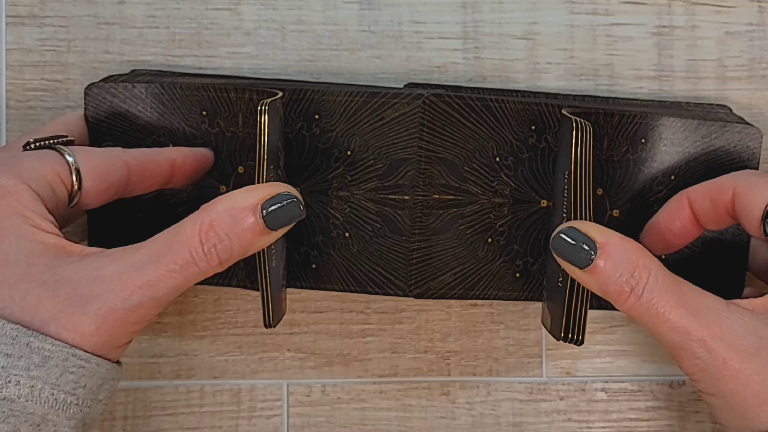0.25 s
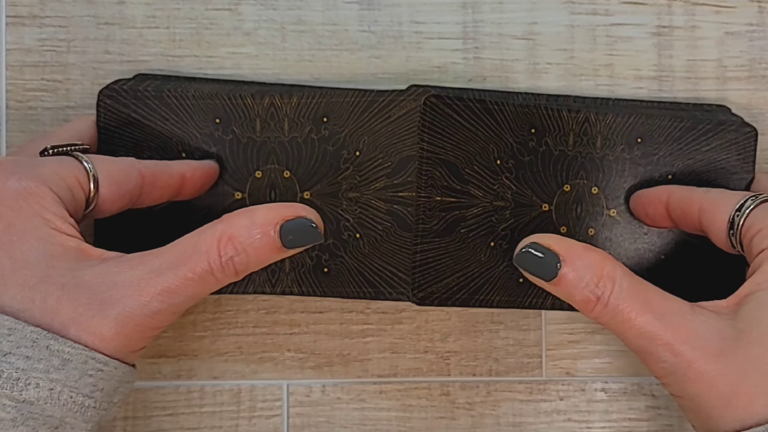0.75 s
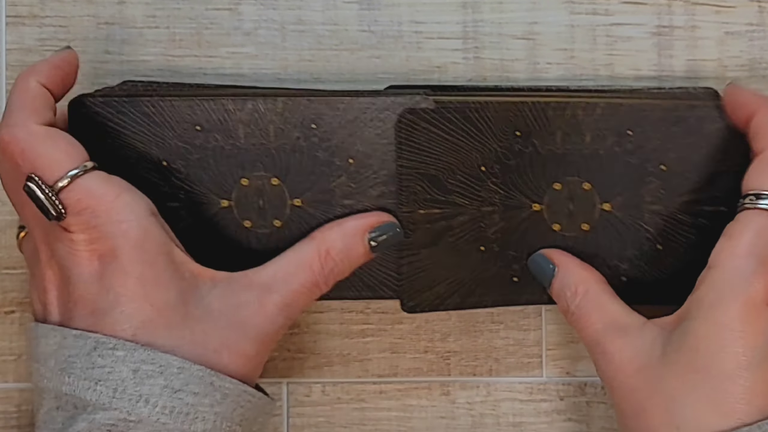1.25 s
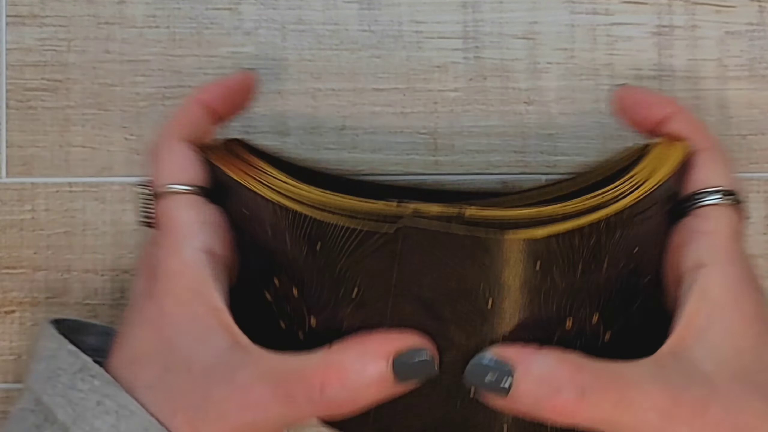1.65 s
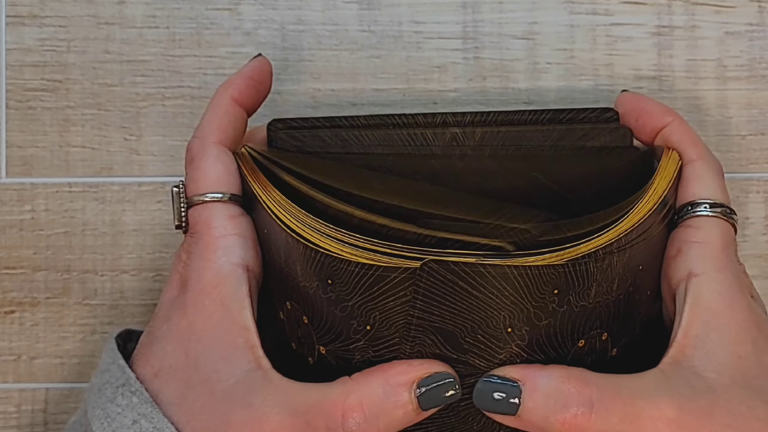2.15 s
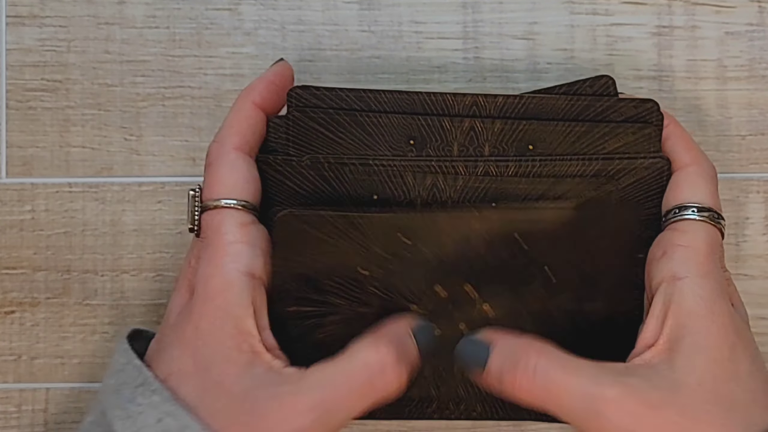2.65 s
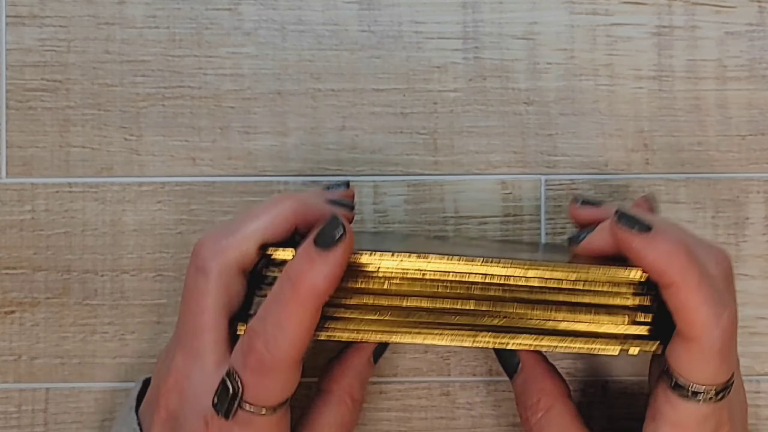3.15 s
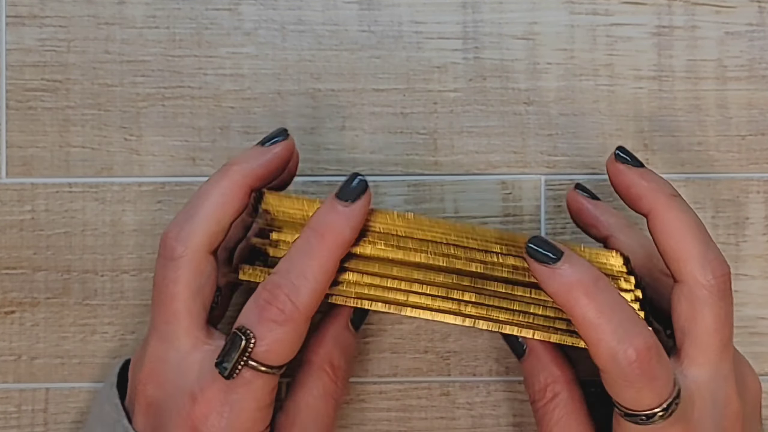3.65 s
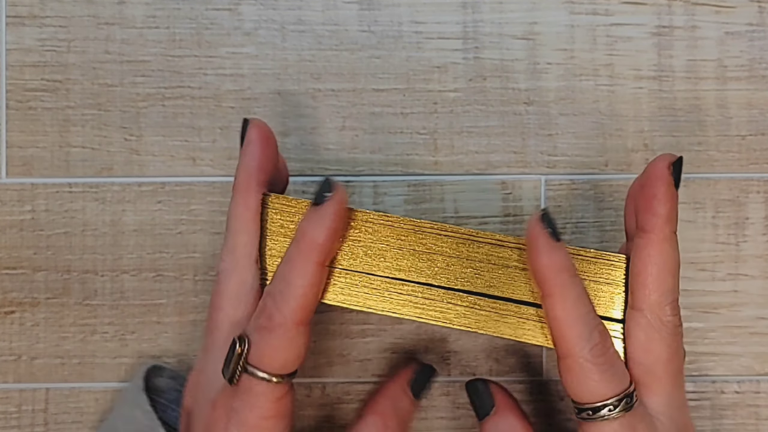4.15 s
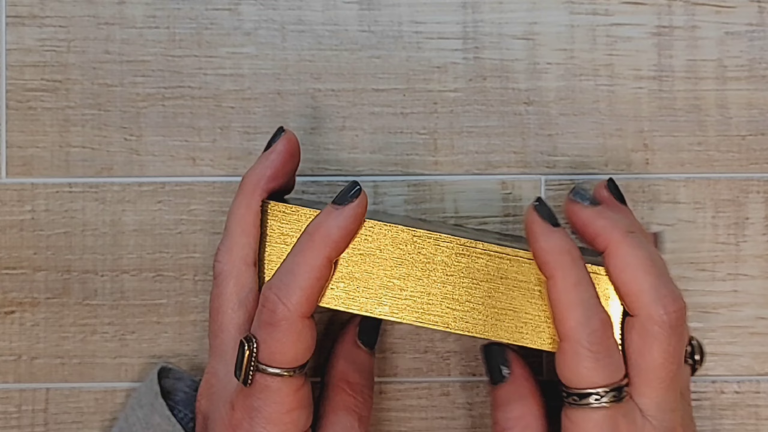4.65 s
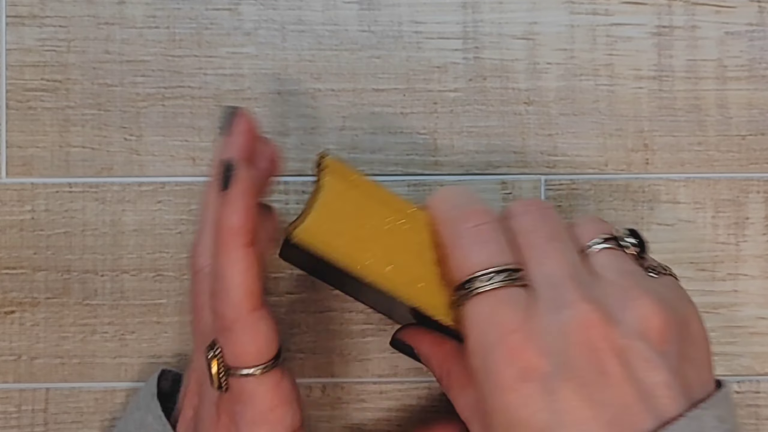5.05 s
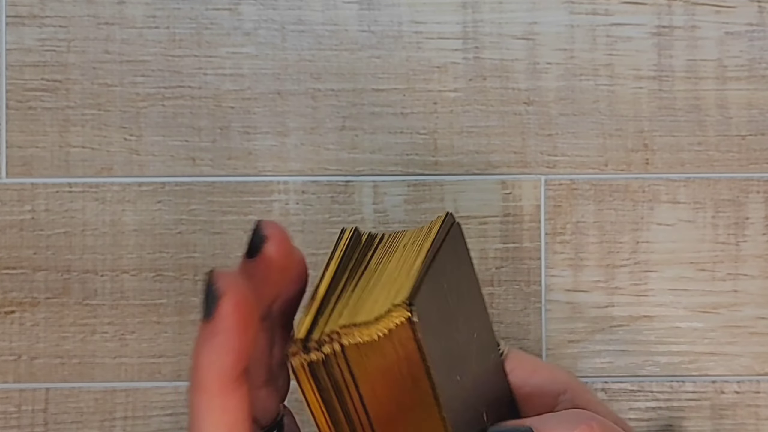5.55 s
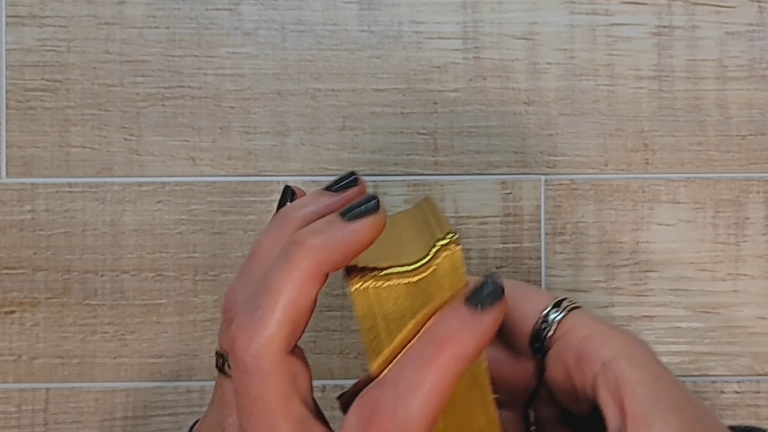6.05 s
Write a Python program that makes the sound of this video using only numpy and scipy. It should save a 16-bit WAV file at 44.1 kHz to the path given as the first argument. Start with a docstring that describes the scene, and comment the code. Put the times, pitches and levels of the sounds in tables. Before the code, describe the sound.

Stiff cards riffle in uneven sharp snaps, pause, cascade together in a bright whirring rush, then get knocked square and slapped once in a small room.

```python
"""At a wooden table in a small damped, humming room, one microphone close to a deck of stiff cards.
The deck is riffled, bridged so the cards cascade together, then squared and tapped.
Each card snaps: a noise burst rings its air pocket, with a short crack above and a thud below.
Sliding faces hiss as flickering, gritty noise; the table top booms under hands and blows as resonated noise;
close surfaces return a dense, smooth, short tail, and the room hum is steady low noise."""
import sys
import numpy as np
from scipy import signal
from scipy.io import wavfile
from scipy.ndimage import uniform_filter1d

SR = 44100
rng = np.random.default_rng(int(sys.argv[2]) if len(sys.argv) > 2 else 0)


def decibels_to_gain(level_db):
    """Convert a level in decibels to a linear amplitude gain (20 dB per decade)."""
    exponent = np.asarray(level_db, float) / 20
    return 10 ** exponent


def to_wav(sig):
    """Store sig (one row per channel, or 1-D mono) as 16-bit WAV at the path in sys.argv[1].

    Samples outside -1..1 are clipped; the rate is SR.
    """
    pcm = np.clip(np.atleast_2d(sig), -1, 1) * 32767
    pcm = np.round(pcm).astype(np.int16)
    wavfile.write(sys.argv[1], SR, pcm.T)  # frames by channels


N = 277551   # length in samples

# Room hum behind the table. Each row: frequency in Hz, relative density in dB per Hz.
HUM_SPECTRUM = [(30, -39.5), (79, -9.5), (98, -9), (145, -19.5), (287, -25.5), (364, -23.5), (449, -40),
                (499, -36), (1160, -50), (2200, -61), (4000, -55.5), (6600, -58.5), (8300, -67),
                (16000, -70)]
# Hiss of card faces rubbing. Each row: frequency in Hz, relative density in dB per Hz.
RUBBING_SPECTRUM = [(130, -21.5), (220, 3.5), (451, 3.5), (1550, 5.5), (3360, 3.5), (6530, 1),
                    (16000, -17.5)]
# Strokes of card faces sliding. Each row: start of full level in seconds, hold in seconds,
# climb in seconds for its last 20 dB (anything under 0.012 counts as 0.012), level in dB, treble share in dB.
SLIDING_STROKES = [(0.01, 0.72, 0.6, -59.5, -8), (1.195, 0.8, -0.27, -62, -11.5),
                   (1.247, 0.02, -0.09, -53, -12), (1.315, 0.014, -0.25, -52, -15),
                   (1.406, 0.025, -0.09, -55, -19), (1.461, 0.0068, -0.09, -52, -4),
                   (1.53, 0.012, -0.03, -46, -12.5), (1.639, 0.033, 0.06, -50.5, -13.5),
                   (1.819, 0.24, 0.0459, -30.5, 6), (2.065, 0.715, 0.0147, -28.5, 3),
                   (2.812, 0.042, 0.15, -48, -19), (3.048, 0.064, 0.0672, -32.5, -9),
                   (3.24, 0.025, 0.06, -36, -17.5), (3.3, 0.053, 0.0835, -27.5, -25),
                   (3.515, 0.025, 0.03, -46.5, -34), (3.567, 0.051, 0.11, -39, -29),
                   (3.671, 0.06, -0.11, -52, -29), (3.775, 0.054, -0.45, -53.5, -19.5),
                   (3.947, 0.0063, 0.3, -55, -34), (3.962, 0.12, -0.26, -49.5, -19),
                   (4.082, 0.035, -0.0541, -39.5, -22), (4.261, 0.06, -0.0742, -49.5, -17.5),
                   (4.791, 0.034, -0.23, -65, -38), (4.969, 0.054, 0.03, -52, -26),
                   (5.035, 0.088, 0.03, -58, -18), (5.129, 0.018, 0.0547, -37, -15),
                   (5.191, 0.032, 0.06, -35, -18.5), (5.664, 0.075, 0, -72.5, -12),
                   (5.944, 0.025, 0.03, -50, -19.5), (5.977, 0.029, 0.3, -61.5, -4)]
# Cards that slip off a thumb, then slap flat on the pile.
# Each row: slip in seconds, slap in seconds, slip level in dB, slap level in dB, air pocket of the slap in Hz.
RIFFLED_CARDS = [(0.025, 0.0406, -23, -17.5, 1660), (0.054, 0.066, -21.5, -15, 990),
                 (0.07, 0.084, -16.5, -7.5, 1557), (0.17, 0.184, -16.5, -10, 1189),
                 (0.286, 0.3013, -23.5, -15.5, 1640), (0.309, 0.3254, -14.5, -8.5, 1526),
                 (0.383, 0.396, -17, -7.5, 1664), (0.513, 0.528, -16.5, -12, 1122),
                 (0.545, 0.559, -13.5, -7.5, 1456), (0.631, 0.648, -11.5, -4, 2250),
                 (0.664, 0.68, -9.5, -12, 1765), (0.697, 0.709, -8.5, -8.5, 2015),
                 (0.78, 0.794, -7, -8.5, 1759), (0.869, 0.884, -13.5, -14.5, 1892)]
# An edge drags on the thumb before a run of cards. Each row: start in seconds, level in dB.
THUMB_DRAGS = [(0.162, -29.5), (0.285, -32), (0.3775, -27), (0.508, -32)]
# Pushes of the hands on the table top.
# Each row: strongest moment in seconds, low boom level in dB, upper boom level in dB.
HAND_PUSHES = [(0.059, -31.5, -45.5), (0.35, -34, -42), (0.6, -32.5, -39), (0.8, -30, -40),
               (1.25, -45, -52.5), (1.57, -36, -35), (1.88, -40, -44.5), (2.17, -30, -49),
               (2.4, -37, -44.5), (2.679, -29, -36), (3.34, -30, -34.5), (3.62, -47.5, -34.5),
               (4.129, -44, -43), (5.119, -39.5, -41.5), (5.285, -33, -40)]
# Low plate modes of the table top.
# Each row: frequency in Hz, width in Hz of the first of two resonators (the second is twice as wide), level in dB.
TABLE_LOW_MODES = [(75, 18, 4), (82.6, 96, -6.5), (109.55, 7.7, 4)]
# Cards and deck edges knocking while bridged and squared.
# Each row: start in seconds, level in dB, air pocket in Hz, crack in dB relative to that level.
KNOCKS = [(1.196, -47, 1300, -18), (1.533, -37, 3320, -1), (1.798, -22.5, 1747, -28),
          (1.865, -14.5, 1710, -21), (1.872, -6.5, 2028, -18.5), (1.888, -16, 873, -9),
          (2.817, -21, 1485, 11), (3.183, -26.5, 2390, -14.5), (3.202, -17.5, 2356, -21),
          (3.225, -20.5, 1500, -31.5), (3.299, -8.5, 2212, -16), (3.311, -9, 1800, -7.5),
          (3.319, -3, 3440, -11), (3.337, -10, 2980, -39), (3.38, -23.5, 2777, -21.5),
          (3.389, -16.5, 2000, -34.5), (3.449, -30, 2150, -18), (3.454, -23.5, 2733, -24),
          (3.476, -35, 1505, -37.5), (3.5, -21.5, 2010, -21), (3.573, -31, 1900, -29.5),
          (3.622, -20.5, 2500, -22), (3.667, -22, 2827, -17), (3.725, -37, 1800, -17),
          (3.869, -38.5, 636, -38), (3.897, -38, 1640, -45), (3.95, -14.5, 2260, -24.5),
          (4.017, -21.5, 2577, -32), (4.027, -14, 2886, -16.5), (4.094, -21, 2623, -19),
          (4.111, -25.5, 2208, -30), (4.26, -29, 3315, -21.5), (5.101, -21.5, 2454, -24),
          (5.221, -17, 6015, -7), (5.67, -54, 800, -11.5), (5.816, -53, 5030, -24.5),
          (5.863, -51.5, 5970, -22.5), (5.949, -37.5, 3400, -15), (5.972, -50, 2200, -21),
          (6.195, -42.5, 4500, -12)]
# The clearest cards of the cascade, whistling as they slip home.
# Each row: start in seconds, level in dB, air pocket in Hz.
CLEAR_WHISTLES = [(1.98, -17.5, 2414), (1.995, -15, 6590), (2.114, -13.5, 5800), (2.204, -14, 6000),
                  (2.221, -11, 3900), (2.471, -14, 4830), (2.498, -12.5, 4630), (2.574, -10, 6380),
                  (2.765, -10, 7500)]
# The clearest cards landing flat under the arch. Each row: start in seconds, level in dB, air pocket in Hz.
CLEAR_FLAPS = [(2.052, -11.5, 1060), (2.084, -27, 502), (2.128, -20, 894), (2.14, -21, 1300),
               (2.193, -23, 551), (2.234, -18, 692), (2.333, -23.5, 1500), (2.367, -25.5, 599),
               (2.467, -24.5, 1240), (2.534, -19, 1400), (2.597, -21.5, 1000), (2.629, -23.5, 521),
               (2.652, -14.5, 1164), (2.707, -22, 801), (2.76, -22, 803), (2.793, -18, 740)]
# Modes of the closed deck under a palm. Each row: frequency in Hz, level in dB.
DECK_MODES = [(845, -9), (1600, -7.5), (2520, -2), (4270, -0.5), (5120, 2.5), (6700, -5), (8000, -3)]


def rms_one(x):
    """Scale to rms 1."""
    return x / np.sqrt(np.mean(x ** 2) + 1e-20)


def drift(rate_hz):
    """Random wavering of rms 1: noise low-passed at about rate_hz."""
    pole = np.exp(-40 * np.pi * rate_hz / SR)   # computed at every 20th sample
    noise = rng.standard_normal(N // 20 + 2002)
    slow = signal.lfilter([1], [1, -2 * pole, pole * pole], noise)[2000:]
    return np.interp(np.arange(N) / 20, np.arange(len(slow)), rms_one(slow))


def resonance(x, hz, width_hz):
    """Two-pole peak of gain 1."""
    r = np.exp(-np.pi * width_hz / SR)
    feedback = [1, -2 * r * np.cos(2 * np.pi * hz / SR), r * r]
    return signal.lfilter([(1 - r * r) / 2, 0, (r * r - 1) / 2], feedback, x)


def band(x, low_hz, high_hz):
    """Butterworth band-pass."""
    edges = [low_hz, min(high_hz, SR * .45)]
    return signal.sosfilt(signal.butter(2, edges, "band", fs=SR, output="sos"), x)


def coloured(white, spectrum, tilt, patchy_db, rate_hz):
    """Third-octave bands, each flickering; tilt (dB per octave about 1800 Hz) keeps the unflickered power."""
    out, power = 0, 0
    edges = 28 * 2 ** (np.arange(29) / 3)
    together = drift(rate_hz)
    at_hz, density_db = np.transpose(spectrum)
    for k, (low, high) in enumerate(zip(edges, edges[1:])):
        hz = np.sqrt(low * high)
        slope_db = tilt * max(np.log2(hz / 1800), -.7)   # levels off below about 1100 Hz
        gain = decibels_to_gain(np.interp(np.log(hz), np.log(at_hz), density_db) + slope_db)
        flicker = decibels_to_gain(patchy_db * (0.77 * together + drift(rate_hz)))
        out = out + gain * flicker * band(white[k % 2], low, high)
        power = power + gain ** 2 * (high - low) * 2 / SR
    return out / np.sqrt(power)


def swell(start, hold, db, rise_s, fall_s, bend):
    """Power of gestures, one row each: a climb, a hold and a fall, with times per 20 dB."""
    start, hold, db, rise_s, fall_s = (np.asarray(v)[..., None] for v in (start, hold, db, rise_s, fall_s))
    t = np.arange(0, N, 16) / SR - start   # every 16th sample
    away = np.maximum(-t, 0) / rise_s + np.maximum(t - hold, 0) / fall_s
    return decibels_to_gain(2 * (db - 20 * away ** bend))


def fine(coarse):
    """Spread a control held at every 16th sample over every sample."""
    return np.interp(np.arange(N) / 16, np.arange(len(coarse)), coarse)


def snaps(rows, rise_ms_at_3k, thud_db, width, edge, ring_db=-3.0, crack_hz=3800, puff_db=-60):
    """A click and lumpy burst ring the pocket between cards, with crack, thud (more in large pockets) and puff.

    Each row: start in seconds, level in dB, pocket in Hz, crack in dB, fall in ms. Width is a share of the pitch.
    """
    out = np.zeros(N + 2048)
    t_ms = np.arange(2048) * 1000 / SR
    squeeze = t_ms / 0.33 - 2   # air squeezed out as a face lands: 0.33 ms scale
    puff = squeeze * np.exp(-squeeze ** 2 / 2)
    for s, level_db, hz, crack_db, fall_ms in rows:
        noise, lumps = rng.standard_normal((2, 2048))
        rise_ms = rise_ms_at_3k * (hz / 3000) ** 0.84   # higher pockets swell more slowly
        fall = np.exp(-t_ms / max(fall_ms, .3))
        lumpy = decibels_to_gain(4.5 * rms_one(band(lumps, 130, 2000)))
        burst = noise * (1 - np.exp(-(t_ms / rise_ms) ** 2)) * fall * lumpy
        burst[20] += edge   # click of first contact
        pocket = band(burst, 0.5 * hz, 1.9 * hz)
        ring = resonance(pocket, hz, width * hz)
        card = band(pocket, 0.26 * hz, 2.6 * hz)
        crack = band(burst * fall ** 0.4, crack_hz, 13500)   # briefer than the ring
        thud = band(burst, 170, 560)
        pocket_thud_db = thud_db - 3.9 * np.log2(hz / 1000)
        gains = decibels_to_gain(level_db + np.array([ring_db, -7., crack_db, pocket_thud_db, puff_db]))
        at = max(round(s * SR) - 20, 0)   # puts the click on the stated moment
        parts = [ring, card, crack, thud, puff]
        out[at:at + 2048] += sum(g * p / np.abs(p).max() for g, p in zip(gains, parts))
    return out[:N]


def hum():
    """The small room's steady hum: mostly low noise whose bands waver slowly."""
    white = rng.standard_normal((2, N))
    return decibels_to_gain(-53) * coloured(white, HUM_SPECTRUM, 0, patchy_db=2.5, rate_hz=5.4)


def slide():
    """Paper grain catches as fast noise, edges snag now and then; pressed cards slide duller than free ones."""
    start, hold, climb, db, treble = np.transpose(SLIDING_STROKES)
    climb = np.maximum(climb, .012)
    power = swell(start, hold, db, climb, 0.7 * climb, bend=0.89)   # falls are quicker than climbs
    # a very faint constant hiss under the strokes keeps the total above zero
    floor, floor_treble_db = decibels_to_gain(2 * -92), -9
    total = power.sum(axis=0) + floor
    treble_db = fine((treble @ power + floor_treble_db * floor) / total)

    snags_per_s, mean_snag, snag_s = 54, 0.25, 0.0025
    snags = (rng.random(N) < snags_per_s / SR) * rng.exponential(1, N) * mean_snag
    snags = 1 + signal.lfilter([1], [1, -np.exp(-1 / max(snag_s * SR, 2))], snags + 1e-18)
    catches = decibels_to_gain(2.6 * np.minimum(rng.exponential(1, (2, N)), 4))
    grit = rng.standard_normal((2, N)) * catches * snags

    free_treble_db = -9   # treble share of freely sliding faces: no tilt
    tilt = (treble_db - free_treble_db) / np.log2(11000 / 1800)
    faces = coloured(grit / grit.std(), RUBBING_SPECTRUM, tilt, patchy_db=2.5, rate_hz=18.0)
    # from 3.4 s, closed into a block, the deck rubs with a fuller body
    block = band(faces, 250, 830)
    closed = np.clip((np.arange(N) / SR - 3.4) * 10, 0, 1)
    return fine(np.sqrt(total)) * (faces + decibels_to_gain(2.5) * closed * block)


def riffle():
    """Every card slips with a thin double whistle, then lands with a fuller slap; some edges drag first."""
    mean_slip_hz, slip_crack_db, slip_ms = 4340, -19, 2.6   # the edge leaving the thumb
    slap_crack_db, slap_ms = -3, 3.65   # the face landing
    whistles = [(0, 1), (-5, 1.62)]   # level in dB, multiple of the slip pitch
    edges = [(row[0], row[2]) for row in RIFFLED_CARDS] + THUMB_DRAGS
    bends = 1 + 0.11 * rng.standard_normal(len(edges))
    slips = [(s, db + less_db, mean_slip_hz * bend * multiple, slip_crack_db, slip_ms)
             for (s, db), bend in zip(edges, bends)
             for less_db, multiple in whistles]
    slaps = [(slap, db, hz, slap_crack_db, slap_ms) for _, slap, _, db, hz in RIFFLED_CARDS]
    return (snaps(slips, rise_ms_at_3k=1.6, thud_db=-8.0, width=0.1, edge=0.28)
            + snaps(slaps, rise_ms_at_3k=1.3, thud_db=-12.5, width=0.42, edge=4.0,
                    ring_db=-5.0, crack_hz=2490, puff_db=-16.0))


def room(x):
    """A dense, smooth, short tail off close surfaces; each path takes its own randomly varied share of sound."""
    paths, t60_s, wet_db, share_rate_hz = 5, 0.17, -10, 350
    t = np.arange(SR // 2) / SR
    decay = decibels_to_gain(-60 * t / t60_s) * np.clip(t / 0.0014, 0, 1)
    tails = band(rng.standard_normal((paths, len(t))) * decay, 290, SR / 2)
    # fast random shares smear the streaks that a burst of random noise would leave in the tail
    wet = sum(signal.fftconvolve(x * drift(share_rate_hz), tail)[:N] for tail in tails)
    return decibels_to_gain(wet_db) * wet / np.sqrt(np.sum(tails ** 2))


def table(blows):
    """Rumble from the hands and the momentum of every blow drive the plate modes of the table top."""
    s, low_db, upper_db = np.transpose(HAND_PUSHES)

    def effort(db, rise_s, fall_s, still_db):
        """Pushes over the faint boom of hands lying still."""
        pushes = swell(s, 0, db, rise_s, fall_s, bend=1.2).sum(axis=0)
        return fine(np.sqrt(pushes + decibels_to_gain(2 * still_db)))

    def even(x):
        """Noise evened to a constant short-term level before the pushes shape it."""
        return x / np.sqrt(uniform_filter1d(x ** 2, size=5000))

    momentum = rms_one(band(np.abs(blows), 74, 480))
    push = rng.standard_normal((2, N)) + 0.4 * momentum
    low = sum(decibels_to_gain(db) * resonance(resonance(push[0], hz, w), hz, 2 * w) for hz, w, db in TABLE_LOW_MODES)
    upper = resonance(resonance(push[1], 166, 9.8), 166, 9.8)
    return (effort(low_db, rise_s=0.24, fall_s=0.21, still_db=-58) * even(low)
            + effort(upper_db, rise_s=0.16, fall_s=0.14, still_db=-70) * even(upper))


def taps():
    """Cards and deck edges knock; harder knocks last longer."""
    full_scale_ms, ms_per_db = 7.47, 0.16   # fall of a 0 dB knock, and its change with level
    rows = [(*row, full_scale_ms + ms_per_db * row[1]) for row in KNOCKS]
    return snaps(rows, rise_ms_at_3k=1.7, thud_db=-11.0, width=0.49, edge=5.4)


def flurry(start, end, level_db, count, low_hz, octaves, crack_db, spread_ms):
    """Rows for cards at uneven moments, each with a pocket of its own size."""
    gap, size, pitch, length = rng.random((count, 4)).T
    when = np.cumsum(.3 + 1.4 * gap)
    when = start + (end - start) * when / when[-1]
    levels_db = level_db + 7.0 * (size - .5)
    pockets_hz = low_hz * 2 ** (octaves * pitch ** .6)
    return zip(when, levels_db, pockets_hz, np.full(count, crack_db), 0.937 + spread_ms * length)


def cascade():
    """Card after card slips home under the arch with a narrow whistle, and lands flat with a broad flap."""
    slips = flurry(start=1.84, end=2.79, level_db=-19.5, count=95,
                   low_hz=2500, octaves=1.7, crack_db=-12.0, spread_ms=3.5)
    clear = [(*row, -8.5, 5) for row in CLEAR_WHISTLES]   # crack in dB, fall in ms
    landings = flurry(start=2.06, end=2.78, level_db=-31.5, count=40,
                      low_hz=459, octaves=1.84, crack_db=-8.5, spread_ms=2.2)
    flat = [(*row, -13, 3.4) for row in CLEAR_FLAPS]   # crack in dB, fall in ms
    return (snaps([*clear, *slips], rise_ms_at_3k=0.96, thud_db=-18.5, width=0.11, edge=0.81)
            + snaps([*flat, *landings], rise_ms_at_3k=0.73, thud_db=-7.0, width=1.0, edge=4.2, puff_db=-13.0))


def palm_slap():
    """A palm on the end of the deck: a short rough push rings its paper-damped modes over a broad crack."""
    at_s, peak_db, rise_ms, fall_ms = 5.2655, -4, 2.5, 5
    t_ms = np.arange(2048) * 1000 / SR
    shape = (1 - np.exp(-(t_ms / rise_ms) ** 2)) * np.exp(-t_ms / fall_ms)
    push = shape * rng.standard_normal((len(DECK_MODES) + 1, 2048))
    rings = sum(decibels_to_gain(db) * rms_one(resonance(p, hz, width_hz=330)) for p, (hz, db) in zip(push, DECK_MODES))
    crack = decibels_to_gain(-4.0) * rms_one(band(push[-1], 3800, 11000))
    slap = rings + crack
    out = np.zeros(N)
    out[round(at_s * SR):][:2048] = decibels_to_gain(peak_db) * slap / np.abs(slap).max()
    return out


def scene():
    """Cards, room tail, table and hum, close to one microphone."""
    blows = riffle() + taps() + palm_slap()
    cards = blows + cascade() + slide()
    return (cards + room(cards) + table(blows) + hum())[None]


def band_limit(x):
    """A steep low-pass at the top of the band."""
    return signal.sosfilt(signal.butter(12, 16820, fs=SR, output="sos"), x)


def record(dry):
    """The microphone signal has its peaks rounded a little and its top cut near 16 kHz."""
    soft = 0.64 * np.tanh(dry / 0.68)
    top_cut = signal.cheby2(10, 35, 16150, fs=SR, output="sos")
    mix = signal.sosfilt(top_cut, soft)
    return band_limit(mix)


dry = scene()
out = record(dry)
to_wav(out)
```